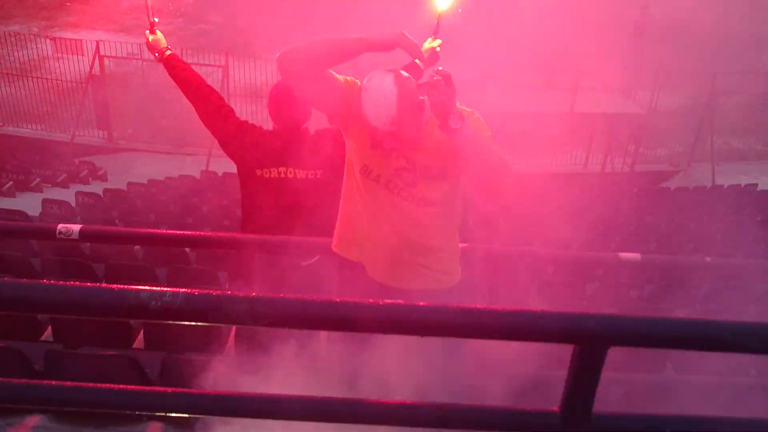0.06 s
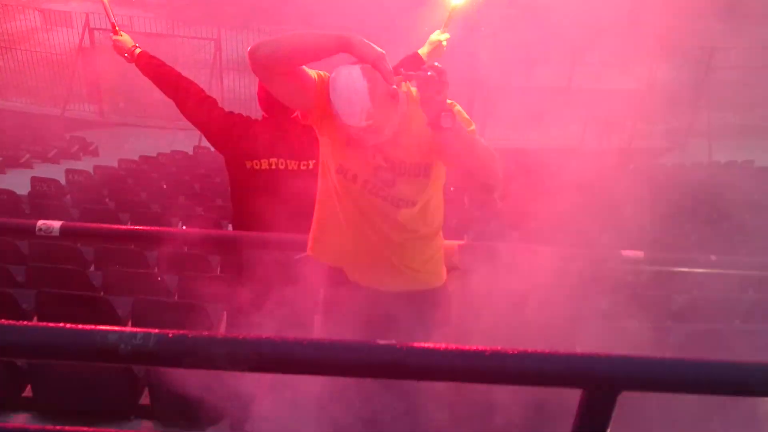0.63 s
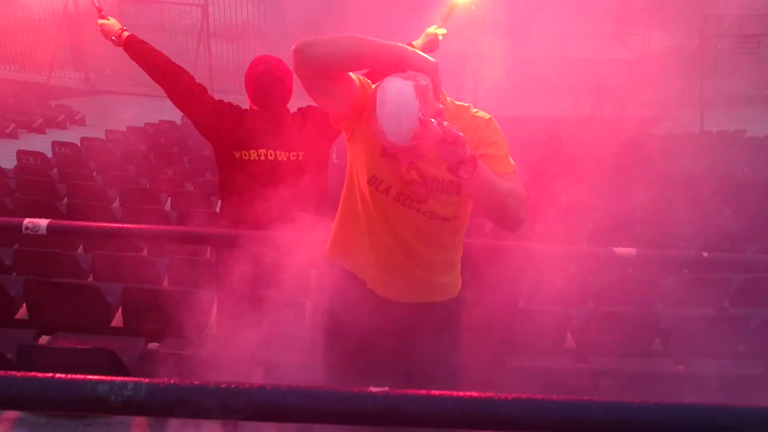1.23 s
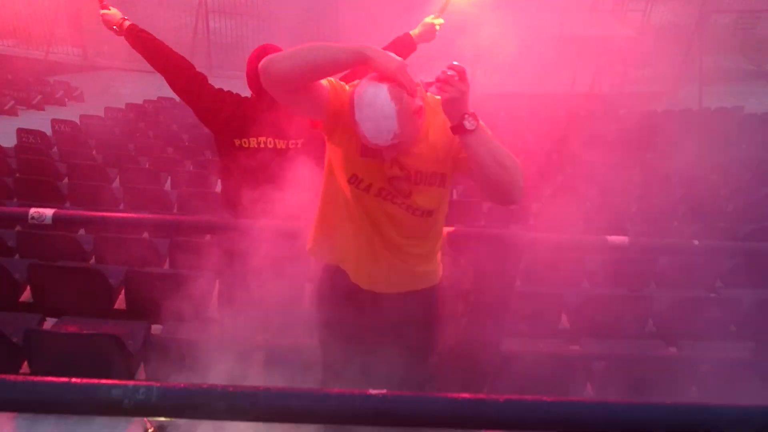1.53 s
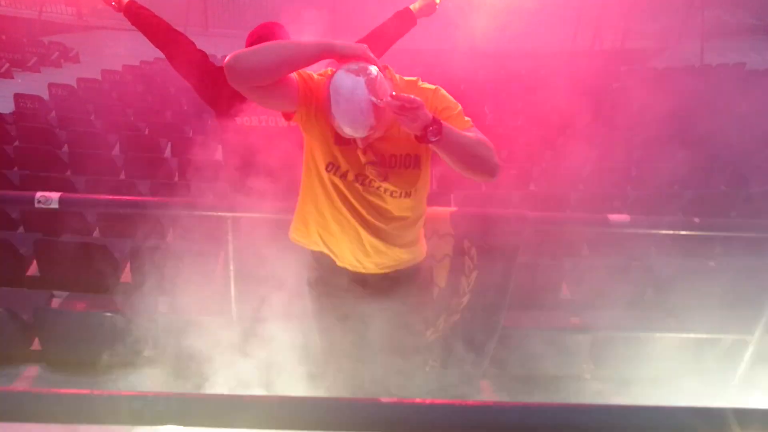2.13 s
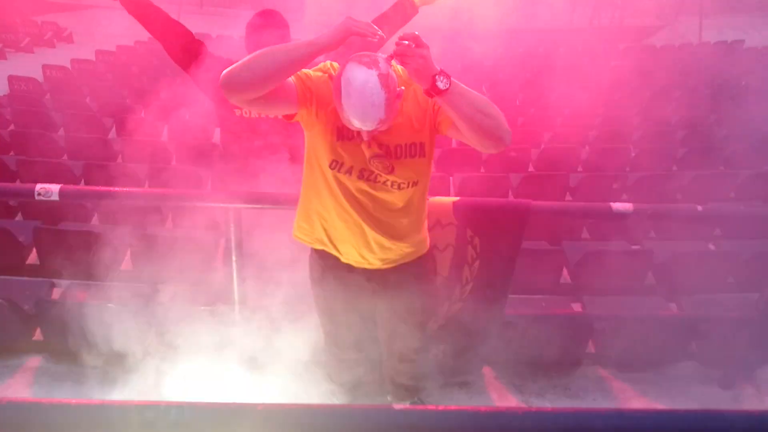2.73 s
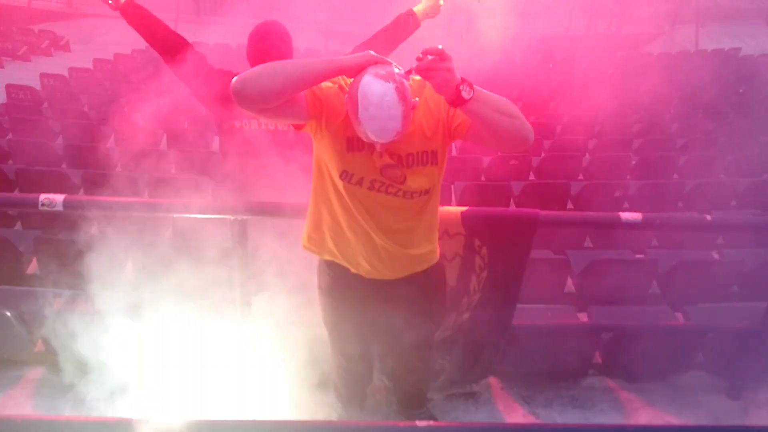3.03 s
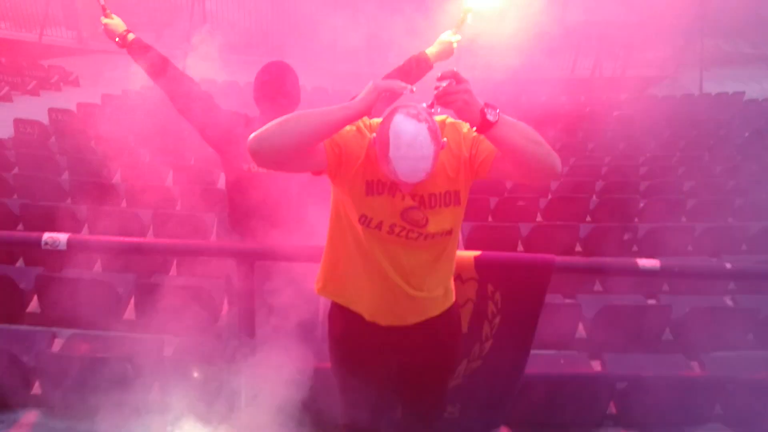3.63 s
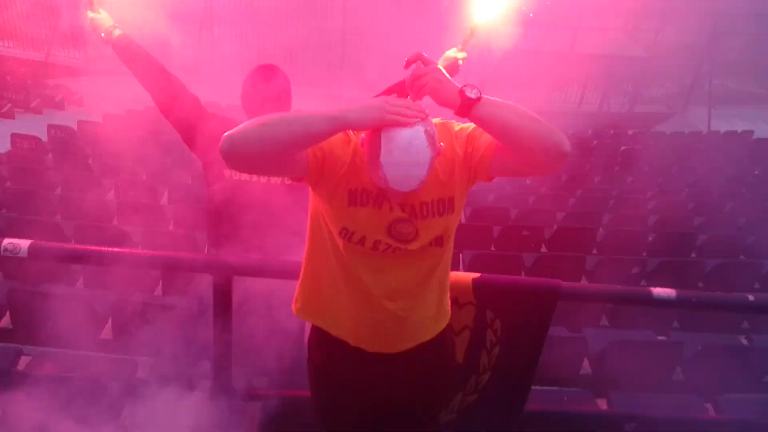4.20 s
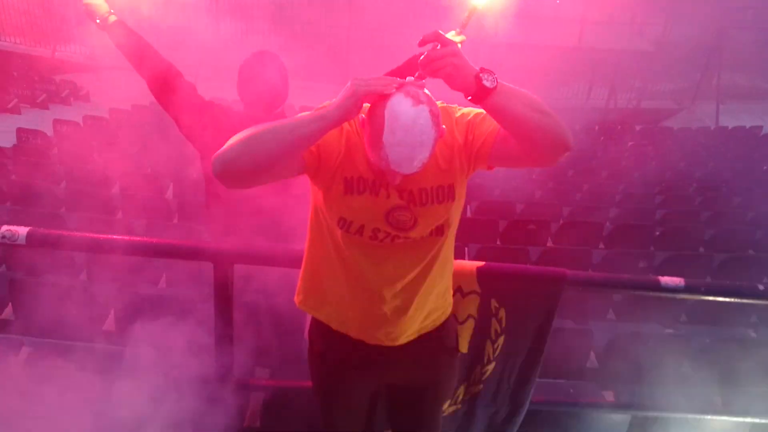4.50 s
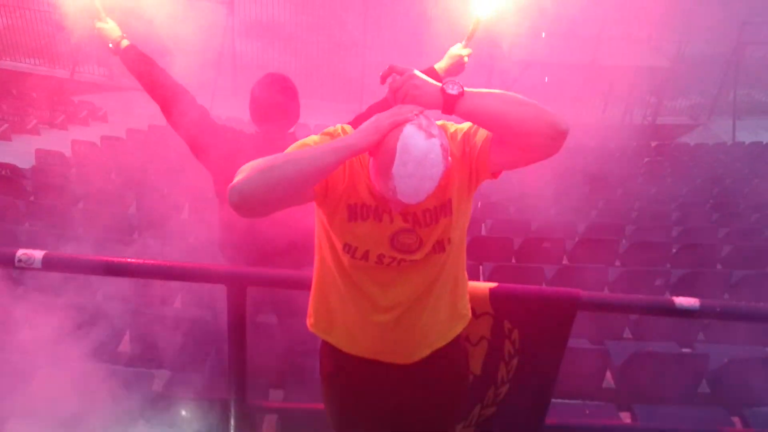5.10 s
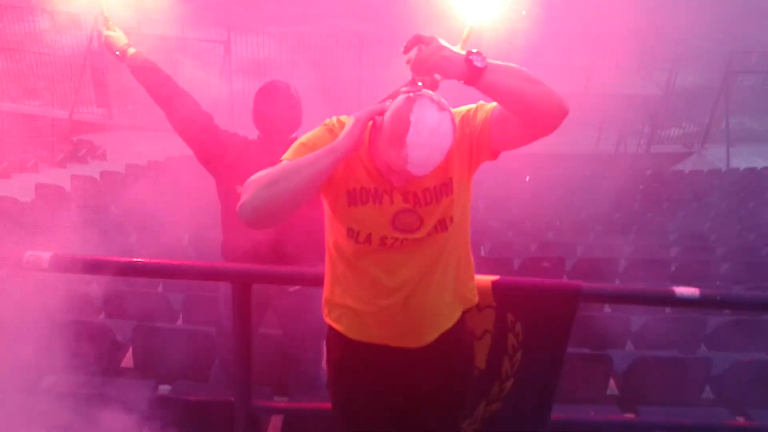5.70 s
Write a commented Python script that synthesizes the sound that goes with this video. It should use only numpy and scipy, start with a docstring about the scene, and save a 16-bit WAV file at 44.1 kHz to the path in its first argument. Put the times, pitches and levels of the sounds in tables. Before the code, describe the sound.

Close, wide and bright, the hiss of burning flares runs throughout, flickering slightly and crackling with tiny sparks. Over it, strobe flares sputter in a fast, slightly uneven string of soft sizzling puffs. Now and then a bit of slag snaps, mostly to the right, and brief, faint low thumps sit underneath. The hiss gradually turns thinner and more whistling, with little echo from the empty stands.

```python
"""Flares in empty stadium stands

Handheld flares burn close by. Their gas jets hiss through slowly wandering resonances, grow thinner
and brighter, and throw off a fine crackle of sparks. Strobe flares on the ground flash about six
times a second, each flash a soft puff with a sizzle, and spit weakly in between.
Now and then a bit of slag pops, and brief low thumps stand out of a faint rumble."""
import sys
import numpy as np
from scipy import signal
from scipy.fft import rfft, irfft
from scipy.io import wavfile
from scipy.ndimage import uniform_filter1d

SR = 44100
rng = np.random.default_rng(int(sys.argv[2]) if len(sys.argv) > 2 else 0)


def int16_out(signal):
    """Quantize to a 16-bit WAV file."""
    q = np.round(np.clip(np.atleast_2d(signal).T, -1, 1) * 32767)
    wavfile.write(sys.argv[1], SR, q.astype(np.int16))


N = 253575
TOP_HZ = 15900
FRAME, HOP = 1024, 256  # the hiss is shaped in short, overlapping frames [samples]
TIME = np.arange(N) / SR
FRAME_S = np.arange(N // HOP + 5) * HOP / SR
BIN_HZ = np.fft.rfftfreq(FRAME, 1 / SR)  # the frequencies in one frame
ALL_HZ = np.fft.rfftfreq(N, 1 / SR)  # the frequencies in the whole sound

# how alike the two microphone openings hear a sound: (frequency [Hz], likeness [0-1], left lead [rad])
MIC_LIKENESS = [(60, 0.97, 3.12), (300, 0.92, 3.02), (970, 0.95, 3.98), (1800, 0.24, 6), (2504, 0.72, 8.96),
                (3580, 0.5, 14.26), (4230, 0, 16.65), (6880, 0.15, 19.8), (8350, 0.24, 18.9),
                (9600, 0.25, 18.4), (12000, 0.1, 19.9)]
# how late the bounce off the concrete steps comes as the microphone moves: (time [s], delay [s])
BOUNCE_DELAY = [(0, 0.00078), (3.0, 0.001), (3.8, 0.0013), (5.75, 0.0012)]
# tone of the rumble: (frequency [Hz], relative level [dB])
RUMBLE_TONE = [(20, -44), (45, -14), (64, 2), (90, -4.5), (130, -7.5), (250, -26), (1000, -55)]
# low thumps in the rumble: (time [s], level [dB])
LOW_THUMPS = [(.3, -55), (.69, -57), (1.26, -48), (1.41, -51), (1.53, -48), (1.96, -55), (2.26, -53),
              (3.02, -55), (3.63, -55), (5.43, -52), (5.56, -53)]
# bursting slag: (time [s], level on the right [dB], pitch [Hz], left over right [dB])
SLAG_POPS = [(1.655, -30, 1200, -5), (2.146, -28.5, 1500, -9), (2.178, -34, 1550, -7),
             (4.026, -33.5, 1310, -7), (4.681, -33, 1450, -10), (4.867, -31.5, 1510, -6),
             (5.33, -31.5, 1450, -9), (5.447, -26.5, 1410, -3)]
# strobe flashes: (time [s], puff strength [dB], sizzle strength [dB])
STROBE_FLASHES = [(0.068, -2.5, -3), (0.232, -2, 0.5), (0.416, -2, 3.5), (0.603, 0.5, 4), (0.79, -0.5, 2.5),
                  (1.0, -0.5, 1.5), (1.201, -1, 4), (1.389, -1, -7), (1.567, 1, 7.5), (1.658, -2.5, -5),
                  (1.765, -1, 5), (1.948, 3, -2), (2.111, 1, -4), (2.241, -2.5, -0.5), (2.29, 0, -4),
                  (2.449, 1.5, 3.5), (2.612, -6, -1), (2.688, -2, -2), (2.777, -1.5, -1), (2.96, -0.5, -3),
                  (3.142, 0, 0), (3.294, -9, -1), (3.325, -1.5, -5), (3.395, -23, -1), (3.459, -2.5, -3),
                  (3.617, -3, 0), (3.76, -0.5, -1), (3.95, 0, 1.5), (4.104, -5, 1), (4.275, 1, 1),
                  (4.458, .5, 5), (4.637, 2, -1), (4.801, -1.5, 0), (4.979, -2.5, 1.5), (5.063, 2, -2),
                  (5.224, 2, 1), (5.263, -1, -3), (5.383, -0.5, 1), (5.45, -1.5, -19), (5.553, 1.5, -6),
                  (5.723, 0.5, 5.5)]
# tone of a flash's low push of gas and of its puff on each side: (frequency [Hz], relative level [dB])
PUSH_TONE = [(20, -48), (45, -15), (70, -3), (110, 2), (200, -6), (330, -8), (600, -44), (2000, -70)]
PUFF_TONE_LEFT = [(100, -13), (220, -15.5), (370, -7), (520, -11.5), (750, -6), (1100, -14), (1350, -6.5),
                  (1750, -1), (2300, -7), (3500, -31), (12000, -32), (15500, -30)]
PUFF_TONE_RIGHT = [(200, -11.5), (380, 2.5), (550, -3.5), (800, -1), (1100, -2), (1400, 2.5), (1800, 3),
                   (2100, -1), (3500, -7.5), (5000, -2.5), (8000, -28), (15000, -28)]
# tone of a flash's sizzle: (frequency [Hz], relative level left [dB], relative level right [dB])
SIZZLE_TONE = [(1000, -42, -34.5), (3540, -25, -10), (5600, -14.5, -16), (6030, -11.5, -20), (6516, 5, -18),
               (7370, -4, -18), (8440, -11, -23), (9400, -7.5, -27), (11100, -27, -22), (12300, -31, -15),
               (15500, -33, -29)]
# tone of the jets' hiss on each side: (frequency [Hz], relative level [dB])
HISS_TONE_LEFT = [(100, -23), (450, -28), (1300, -24.5), (2700, -12.5), (3400, -13.5), (4300, -14),
                  (5300, -13), (6600, 0.5), (8000, -6), (9400, -3.5), (10500, -16), (12000, -19.5),
                  (14500, -27.5), (15800, -25)]
HISS_TONE_RIGHT = [(100, -21.5), (450, -17), (800, -15), (1550, -9), (2150, -3), (3300, -1.5), (4500, -3.5),
                   (5300, -9), (7000, -11), (10800, -11), (12200, -4), (13500, -12), (15800, -14.5)]
# strength of the jets' roar: (time [s], boost [dB])
JET_ROAR = [(0, -4), (.7, -1.5), (1.4, -1), (1.7, -2.5), (2.0, -1.2), (3.45, -2), (4.05, 2.5), (4.5, -0.1),
            (5.75, 0.8)]
# the jets' high whistle: (time [s], pitch [Hz])
JET_WHISTLE = [(0, 9500), (3, 9700), (3.8, 9750), (4.15, 8900), (5.1, 9040), (5.75, 9600)]
# the hollow note of a burning tube: (time [s], pitch [Hz], boost [dB])
TUBE_NOTE = [(0, 3750, 7.5), (.27, 3850, 8), (.45, 3180, 6.5), (.85, 3280, 1.5), (1.5, 3800, 6.5),
             (1.8, 3520, 8.5), (2.1, 3000, 1.5), (2.5, 3060, 2.5), (2.88, 2800, 3), (3.05, 3300, 3.5),
             (3.9, 2930, 1), (4.3, 3360, 1), (5.75, 3300, 1.5)]


def gain_of(db):
    """Turns decibels into a number to multiply a sound by."""
    return 10 ** (np.asarray(db) / 20)


def evened(x):
    """Scales a signal to an average size (rms) of 1."""
    return x / np.sqrt(np.mean(x ** 2) + 1e-20)


def read(rows, hz, column=1):
    """Looks up one column of a frequency table, gliding between its rows on a log scale."""
    table = np.transpose(rows)
    return np.interp(np.log(hz + 1), np.log(table[0] + 1), table[column])


def follow(rows, t):
    """Looks up every column of a time table at the times t."""
    s, *columns = np.transpose(rows)
    return [np.interp(t, s, c) for c in columns]


def add(mix, s, sound):
    """Lays a stereo sound into the mix at s seconds."""
    part = mix[:, max(round(s * SR), 0):][:, :sound.shape[1]]
    part += sound[:, :part.shape[1]]


def flutter(rate_hz):
    """A random wobble of size 1, mostly slower than the given rate."""
    spectrum = rfft(rng.standard_normal(N)) * (ALL_HZ > 0)
    return evened(irfft(spectrum / (1 + (ALL_HZ / rate_hz) ** 2), N))


def stereo_spectra(shape, hz):
    """Noise spectra for the two microphone openings: partly alike, and shifted in phase."""
    a, b, c, d = rng.standard_normal((4,) + shape)
    likeness = np.clip(read(MIC_LIKENESS, hz), 0, 1)
    right = a + 1j * b
    left = likeness * right + np.sqrt(1 - likeness ** 2) * (c + 1j * d)
    return np.array([left * np.exp(1j * read(MIC_LIKENESS, hz, column=2)), right])


def steady_noise(left, right, right_column=1):
    """Stereo noise of size 1, with a tone table for each side."""
    tone = gain_of([read(left, ALL_HZ), read(right, ALL_HZ, right_column)])
    return evened(irfft(stereo_spectra(ALL_HZ.shape, ALL_HZ) * tone, N))


def bursts(times, levels_db, rise_s, fall_s):
    """The loudness curve of a row of short bursts, each swelling to its level and dying away."""
    power = np.zeros(N)
    for s, db in zip(times, levels_db):
        near = slice(max(int((s - .2) * SR), 0), int((s + .2) * SR))
        t = TIME[near] - s
        power[near] += gain_of(db) ** 2 * np.exp(-(t / np.where(t < 0, rise_s, fall_s)) ** 2)
    return np.sqrt(power)


def off_the_steps(x, strength, dull_hz):
    """Adds a dull bounce off the steps. It weakens one low band, which sinks as the path grows."""
    delay, = follow(BOUNCE_DELAY, TIME)
    dull = signal.sosfiltfilt(signal.butter(2, dull_hz, fs=SR, output="sos"), x)
    return x + strength * np.array([np.interp(TIME - delay, TIME, side) for side in dull])


def rumble(start_db=-58, db_per_s=-1.7, opposed=0.16):
    """A faint, fading rumble in the stands that swells into brief thumps."""
    times, levels_db = np.transpose(LOW_THUMPS)
    thumps = bursts(times, levels_db, rise_s=0.052, fall_s=0.054)
    level = np.hypot(gain_of(start_db + db_per_s * TIME), thumps)
    noise = irfft(rfft(rng.standard_normal((2, N))) * gain_of(read(RUMBLE_TONE, ALL_HZ)), N)
    return evened(noise - opposed * noise[::-1]) * level  # the two sides partly swing opposite ways


def slag_pops(decay_s=0.0011, tail_db=-21, tail_s=.012):
    """Bits of slag burst with a short snap, and the seats around scatter it back."""
    out, t = np.zeros((2, N)), np.arange(3000) / SR
    left_lead = np.exp(1j * read(MIC_LIKENESS, np.fft.rfftfreq(len(t), 1 / SR), column=2))
    for s, db, hz, left_db in SLAG_POPS:
        band = signal.butter(2, [hz * 0.56, hz * 1.18], "band", fs=SR, output="sos")
        snap = signal.sosfilt(band, rng.standard_normal(len(t)) * np.exp(-t / decay_s))
        snap /= np.sqrt(np.mean(snap[t < .004] ** 2))  # size 1 over the first 4 ms
        left = irfft(rfft(snap) * left_lead) * (t < t[-1] / 2)
        scatter = evened(signal.sosfilt(band, rng.standard_normal((2, len(t))))) * np.exp(-t / tail_s)
        pop = np.array([left, snap]) + gain_of(tail_db) * scatter
        add(out, s, gain_of([[db + left_db], [db]]) * pop)
    return out


def spits(per_s=4.0, strength_db=-7, spread_db=0.5):
    """The strobes spit weakly at random times. Gives rows like those of STROBE_FLASHES."""
    wait, size = rng.random((60, 2)).T
    times = np.cumsum(2 * wait / per_s)
    db = strength_db + spread_db * (2 * size - 1)
    return np.c_[times, db, db][times < TIME[-1]]


def strobes(puff_db=-34, sizzle_db=-27, push_db=-50, ragged_db=1.3, crackle_db=2.0):
    """Each flash throws out a ragged puff, a crackling sizzle and a low push of gas."""
    times, puff_strength, sizzle_strength = np.vstack([STROBE_FLASHES, spits()]).T
    puff = steady_noise(PUFF_TONE_LEFT, PUFF_TONE_RIGHT)
    puff *= bursts(times, puff_db + puff_strength, rise_s=0.0084, fall_s=0.014)
    sizzle = steady_noise(SIZZLE_TONE, SIZZLE_TONE, right_column=2)
    sizzle *= bursts(times, sizzle_db + sizzle_strength, rise_s=0.0075, fall_s=0.011)
    push = steady_noise(PUSH_TONE, PUSH_TONE)
    push *= bursts(times, push_db + 1.4 * puff_strength, rise_s=0.0092, fall_s=0.02)
    puff *= evened(gain_of(ragged_db * flutter(rate_hz=170)))
    sizzle *= evened(gain_of(crackle_db * flutter(rate_hz=250)))
    sizzle[1] *= gain_of(0.7 * (TIME - TIME.mean()))  # drifts to the right as the microphone turns
    return off_the_steps(puff, strength=0.71, dull_hz=1020) + sizzle + push


def hump(centre_hz, width_hz):
    """The bell shape of a resonance: 1 at its centre, less on either side."""
    return 1 / (1 + (2 * (BIN_HZ - centre_hz) / width_hz) ** 2)


def flare_resonances(tube_width_hz=700, hiss_start_db=5, hiss_end_db=-3.5, settle_s=1.6):
    """Resonances wander as the flares burn down. Gives a boost in dB for each frame and frequency."""
    t = FRAME_S[:, None]
    roar_db, = follow(JET_ROAR, t)
    whistle_hz, = follow(JET_WHISTLE, t)
    tube_hz, tube_db = follow(TUBE_NOTE, t)
    # the hiss thins: its lower band settles while the whistle above it grows
    hiss_db = hiss_end_db + (hiss_start_db - hiss_end_db) * np.exp(-t / settle_s)
    gas = roar_db * hump(2830, 3500) + hiss_db * hump(7960, 4200)
    whistle_strength = -4 + 1.89 * t
    whistle = whistle_strength * (1.26 * hump(whistle_hz, 1600) + 0.41 * hump(14300, 3000))
    # a second flare's higher, weaker note wavers in strength
    second_db = -0.5 + 0.4 * np.interp(t, TIME, flutter(rate_hz=1.8))
    tubes = tube_db * hump(tube_hz, tube_width_hz) + second_db * hump(4400, tube_width_hz)
    return gas + whistle + tubes


def sparks(per_s, spread_db):
    """Sparks make tiny clicks, a few of them large, each leaning to one side. Gives spectra by frame."""
    size = gain_of(spread_db * np.minimum(rng.exponential(1, N), 4.5))
    fires = rng.random(N) < per_s / SR
    clicks = evened(size * fires * rng.standard_normal((2, N)))
    padded = np.pad(clicks, ((0, 0), (0, 2 * FRAME)))
    spectra = signal.stft(padded, nperseg=FRAME, noverlap=FRAME - HOP)[2]
    spectra = spectra[:, :, :len(FRAME_S)].transpose(0, 2, 1)  # side, frame, frequency
    return spectra * np.sqrt(2 / np.mean(abs(spectra) ** 2))  # as strong as the gas noise


def jets(left_db=-25.5, right_db=-28.0, crackle_db=-9, flutter_db=0.73, patchy_db=1.6):
    """Gas rushes out of the handheld flares with a crackle of sparks, coloured by the burning tubes."""
    boost_db = flare_resonances()
    # patches of tone drift slowly as the flares and the microphone sway
    patches = uniform_filter1d(rng.standard_normal(boost_db.shape), size=45, axis=0)
    patches = evened(uniform_filter1d(patches, size=6, axis=1))
    crackle = gain_of(crackle_db) * sparks(per_s=5000, spread_db=2.3)
    gas = stereo_spectra(boost_db.shape, BIN_HZ)
    spectra = (gas + crackle) * gain_of(boost_db + patchy_db * patches)
    spectra *= gain_of([read(HISS_TONE_LEFT, BIN_HZ), read(HISS_TONE_RIGHT, BIN_HZ)])[:, None]
    left, right = signal.istft(spectra.transpose(0, 2, 1), nperseg=FRAME, noverlap=FRAME - HOP)[1][:, :N]
    # the flame sputters: the whole hiss flickers quickly, more so on the brighter left side
    left = evened(left) * gain_of(left_db + 0.71 * flutter(rate_hz=49))
    right = evened(right) * gain_of(right_db)
    return np.array([left, right]) * gain_of(flutter_db * flutter(rate_hz=31))


def scene():
    """The jets and their bounce, mixed with the strobes, the pops and the rumble."""
    return off_the_steps(jets(), strength=0.19, dull_hz=960) + strobes() + slag_pops() + rumble()


def record(dry):
    """Cuts away the very highest treble, above TOP_HZ."""
    low_pass = signal.firwin(1023, TOP_HZ, window=("kaiser", 9), fs=SR)
    return signal.oaconvolve(dry, low_pass[None], "same")


dry = scene()
out = record(dry)
int16_out(out)
```